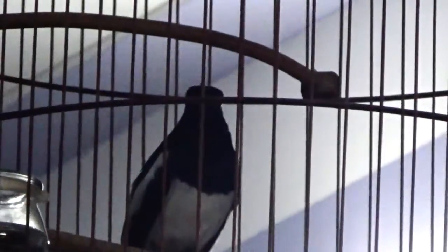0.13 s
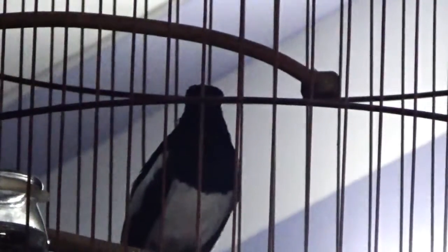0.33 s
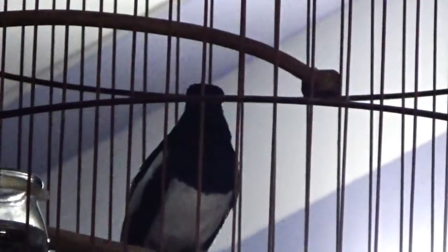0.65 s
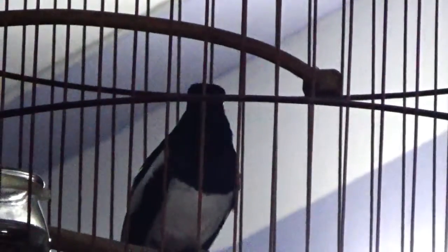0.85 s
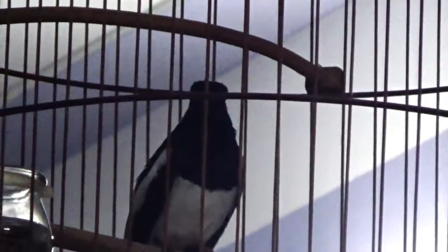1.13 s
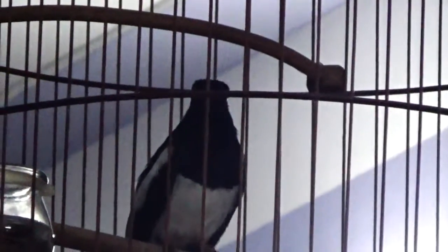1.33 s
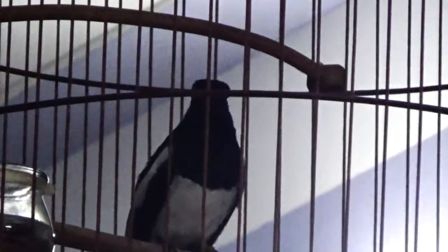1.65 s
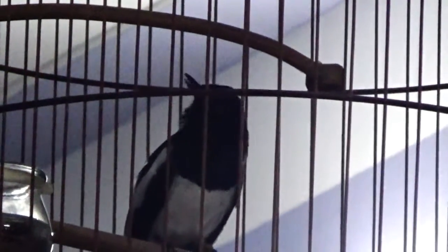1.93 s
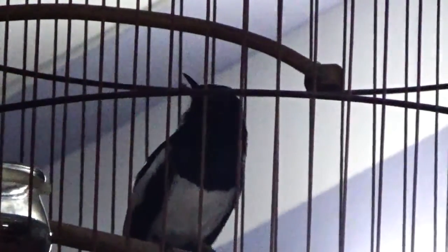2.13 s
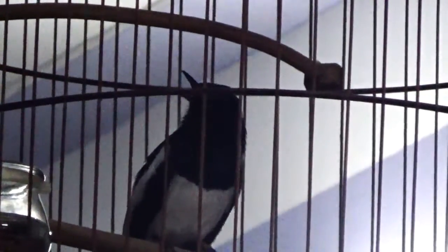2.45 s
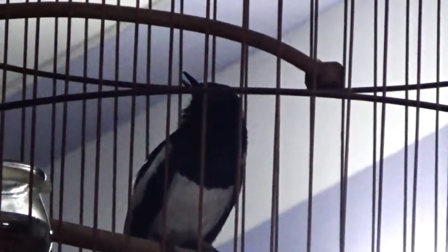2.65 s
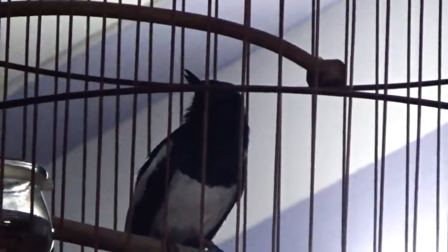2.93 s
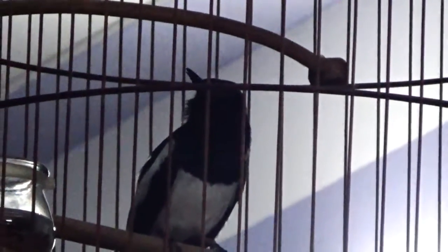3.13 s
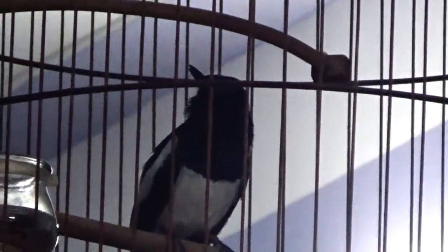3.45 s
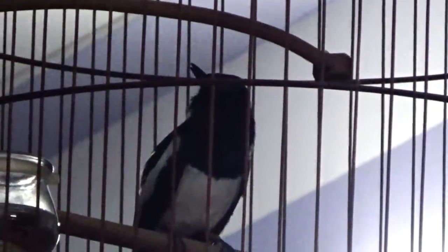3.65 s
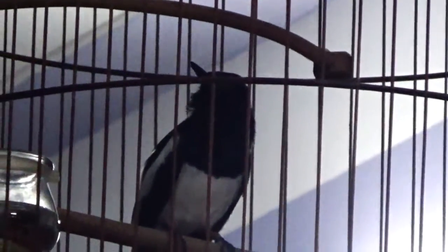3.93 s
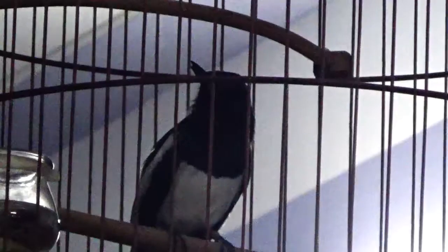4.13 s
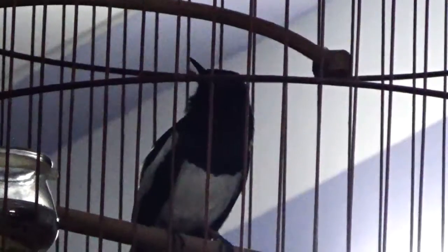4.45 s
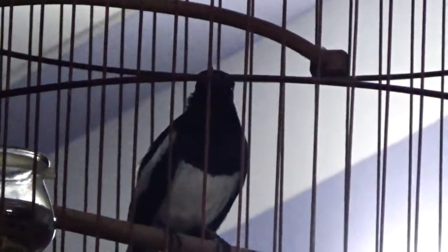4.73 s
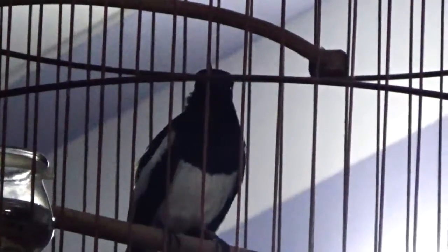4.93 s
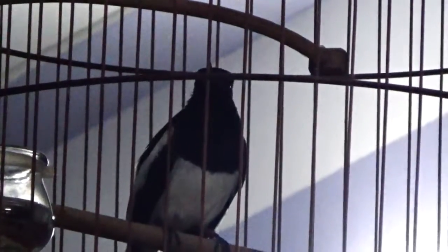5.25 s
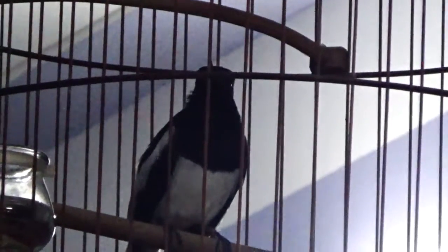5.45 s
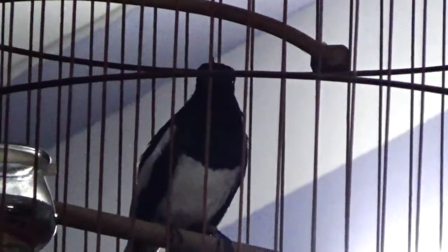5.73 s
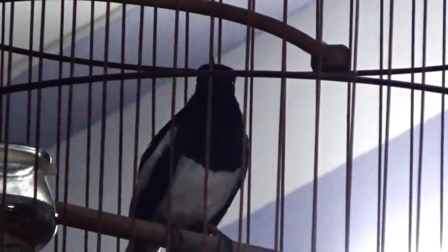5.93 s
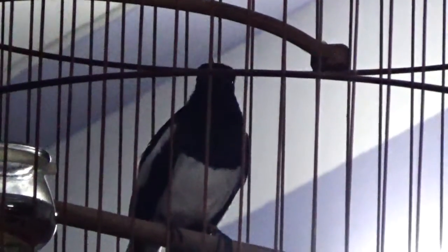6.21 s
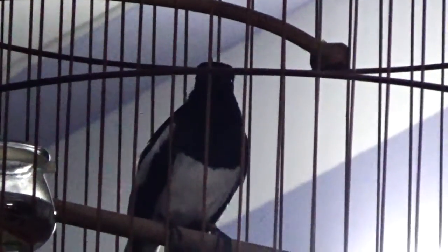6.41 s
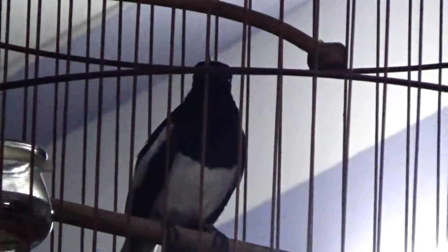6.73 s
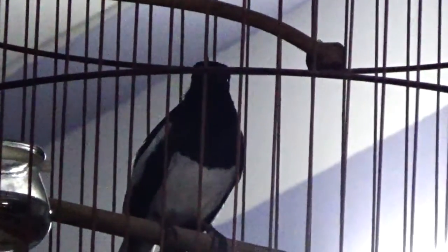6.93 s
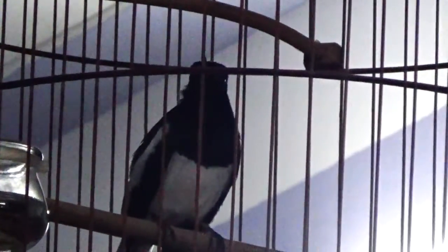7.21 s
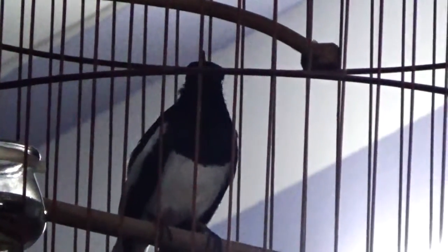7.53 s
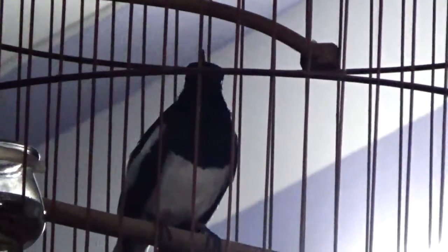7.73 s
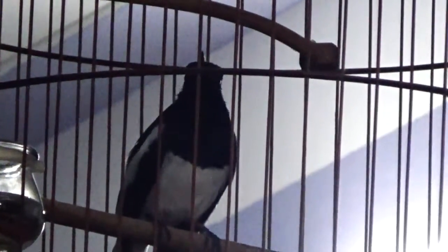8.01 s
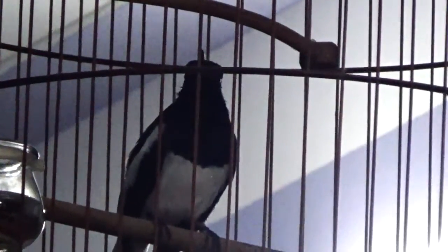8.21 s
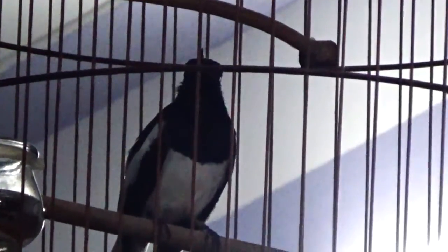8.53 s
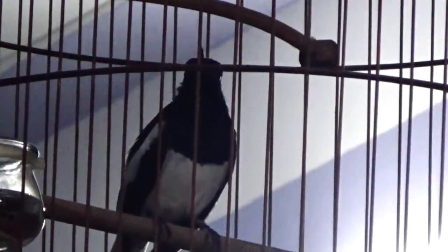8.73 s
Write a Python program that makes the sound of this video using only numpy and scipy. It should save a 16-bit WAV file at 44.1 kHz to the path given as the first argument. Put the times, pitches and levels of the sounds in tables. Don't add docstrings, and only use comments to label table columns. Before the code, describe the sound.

A short harsh rasp opens, then a caged songbird close by whistles loudly: a climbing phrase that falls away in slurred notes, a run of repeated hooked falls, a brief gap, then the climbing phrase again. Some notes turn hoarse or double. The hard room rings after each note. Underneath are faint hum, rustle and dull knocks on the handheld microphone, with far-off peeps and coos.

```python
import sys
import numpy as np
from scipy import signal
from scipy.fft import rfft, irfft, next_fast_len
from scipy.io import wavfile
from scipy.ndimage import uniform_filter1d, minimum_filter1d

SR = 44100
rng = np.random.default_rng(int(sys.argv[2]) if len(sys.argv) > 2 else 0)


def master(y):
    cut = np.clip(np.atleast_2d(y).T, -1, 1)
    pcm = np.round(cut * 32767)
    wavfile.write(sys.argv[1], SR, pcm.astype(np.int16))


def amplitude_ratio(level_db):
    exponent = np.asarray(level_db, float) / 20
    return 10 ** exponent


N = 391166
TIME = np.arange(N) / SR


def unit(x):
    return x / np.sqrt(np.mean(x ** 2))


def hiss(count=N):
    return rng.standard_normal(count)


def spectral(x, gain):
    size = next_fast_len(x.shape[-1], real=True)
    shaped = rfft(x, size) * gain(np.fft.rfftfreq(size, 1 / SR))
    return irfft(shaped, size)[..., :x.shape[-1]]


def colour(x, table):
    hz, db = np.transpose(table)
    return spectral(x, lambda f: amplitude_ratio(np.interp(np.log(f + 1), np.log(hz), db)))


def walk(rate):
    hold = int(SR / rate)
    steps = np.repeat(hiss(N // hold + 1), hold)
    return unit(uniform_filter1d(uniform_filter1d(steps, hold), hold)[:N])


def lines(table):
    def peaks(f):
        return sum(amplitude_ratio(db) / (1 + (2 * (f - hz) / width) ** 2) for hz, width, db in table)
    return unit(spectral(hiss(), peaks))


def whistle(hz, gain, overtone_db, edge_s):
    thin_db, open_hz = 20, 2700
    closed_db = thin_db * np.clip(np.log2(open_hz / hz), 0, 2)
    third_db, fourth_db = overtone_db - 5.5 - closed_db, overtone_db - 23.5 - closed_db
    phase = 2 * np.pi * np.cumsum(hz) / SR
    tone = np.sin(phase)
    for partial, db in ((2, overtone_db), (3, third_db), (4, fourth_db)):
        tone = tone + amplitude_ratio(db) * np.sin(partial * phase) * (partial * hz < .4 * SR)
    age = np.arange(len(hz)) / SR
    ends = np.clip(np.minimum(age, age[::-1]) / edge_s, 0, 1)
    return np.sqrt(2) * gain * tone * ends


# pitch in Hz, width in Hz, level in dB.
HUM_LINES = [(70.3, 4.8, -16), (188, 2.4, -11), (221.2, 6, -3), (299, 6.3, -11), (360, 7.1, -15.5)]


def motor_hum(hum_db):
    hum = lines(HUM_LINES) * amplitude_ratio(hum_db - 2)
    whine = lines([(1335, 8, -66)]) * amplitude_ratio(-66 + 2.5 * walk(1.5))
    return hum + whine


# time in seconds, level in dB.
KNOCKS = [
    (.55, -44.5),
    (0.879, -51),
    (1.15, -40),
    (1.648, -38.5),
    (2.552, -45),
    (4.308, -38),
    (5.68, -31.5),
    (5.821, -36),
    (6.402, -41.5),
    (7.548, -42.5),
]


def phone_knocks():
    hits = np.zeros(N)
    for s, db in KNOCKS:
        hits[int(s * SR)] = amplitude_ratio(db)
    body = unit(colour(hiss(4000), [(25, -7), (120, -6), (1000, -17.5), (3000, -29)]))
    return signal.fftconvolve(hits, body * np.exp(-TIME[:4000] / 0.021))[:N]


def perch_claws():
    tick_age = TIME - 5.473
    tick = amplitude_ratio(-20) * np.sin(2 * np.pi * 6500 * tick_age) * np.exp(-(tick_age / .00008) ** 2)
    scrape_age = np.clip(TIME - 1.2, 0, None)
    wood = unit(colour(hiss(), [(700, -25), (1000, -3), (1350, 6), (1700, -28)]))
    swell = np.exp(-scrape_age / .12) * np.clip(scrape_age / .01, 0, 1)
    return tick + amplitude_ratio(-38) * wood * swell


# time in seconds, hum in dB, rustle in dB.
AIR_LEVELS = [(0.0, -54, -47), (0.15, -50, -51.5), (0.71, -53, -40.5), (0.86, -60, -35), (1.31, -52.5, -49),
              (3.14, -48, -52), (3.63, -47.5, -40), (3.95, -49, -47), (4.45, -45, -43.5),
              (5.11, -60.5, -53.5), (5.29, -44.5, -51), (5.9, -57, -48.5), (6.4, -51.5, -57),
              (6.67, -56.5, -52), (8.57, -52.5, -52), (8.87, -54, -49.5)]
# pitch in Hz, level in dB per Hz.
AIR_COLOUR = [(15, -80), (25, -26.5), (156, -12.5), (212, -12.5), (247, -39), (362, -14.5), (703, -36),
              (1850, -21), (2000, -23), (2780, 2), (3770, -28), (4070, -40), (11000, -42), (14300, -72),
              (22000, -120)]


def background():
    s, hum_db, rustle_db = np.transpose(AIR_LEVELS)
    air_curve = AIR_COLOUR[:7] + [(1600, -16), (4000, -11), (11000, -47.5)]
    bed = amplitude_ratio(-46.5) * unit(colour(hiss((2, N)), air_curve))
    rustle = unit(colour(hiss((2, N)), [(60, -24), (200, -3), (500, -5.5), (1100, -8), (1700, -14.5)]))
    air_mid, air_side = bed + rustle * amplitude_ratio(np.interp(TIME, s, rustle_db) + 3.5)
    hum = motor_hum(np.interp(TIME, s, hum_db))
    contact = phone_knocks() + perch_claws()
    mid = air_mid + hum + contact
    side = amplitude_ratio(-10.5) * air_side - amplitude_ratio(-24.5) * (air_mid + contact)
    return mid, side


# band centre in Hz, time to fall 60 dB in seconds, level in dB.
ROOM = [(930, 0.98, 5), (2000, 0.91, 3), (3000, 1.035, 2.5), (4400, 0.84, 1.5), (6000, 0.89, 0),
        (7550, 0.72, 1.5), (8570, 0.54, 9), (11450, 0.21, 2)]


def tail():
    gap_s, build_s = 0.0014, 0.0013
    age = np.arange(int(1.4 * SR)) / SR
    noise, out = rfft(hiss(len(age))), 0
    place = np.interp(np.fft.rfftfreq(len(age), 1 / SR), np.array(ROOM)[:, 0], np.arange(len(ROOM)))
    for k, (hz, t60, db) in enumerate(ROOM):
        band = irfft(noise * np.clip(1 - abs(place - k), 0, 1), len(age))
        out = out + amplitude_ratio(db - 60 * age / t60) * band
    out = out * np.clip((age - gap_s) / build_s, 0, 1)
    return out / np.sqrt(np.sum(out ** 2))


# start in seconds, end in seconds, first pitch in Hz, last pitch in Hz, level in dB.
FAR_CALLS = [
    (3.33, 3.44, 4120, 4100, -41),
    (3.8, 3.9, 4350, 4750, -39),
    (4.0, 4.2, 4750, 4650, -41),
    (6.65, 6.74, 4430, 4400, -40),
    (8.52, 8.57, 3550, 3730, -36),
    (8.58, 8.72, 3740, 3740, -36),
    (4.22, 4.33, 760, 750, -50),
    (4.4, 4.55, 770, 680, -51),
    (4.62, 4.7, 640, 630, -53),
    (2.33, 2.45, 820, 850, -55),
]


def far_birds():
    out = np.zeros(N)
    for start, end, first_hz, last_hz, db in FAR_CALLS:
        span = slice(int(start * SR), int(end * SR))
        glide = np.linspace(first_hz, last_hz, span.stop - span.start)
        out[span] += whistle(glide, amplitude_ratio(db), -37, 0.005)
    return out


# pitch in Hz, level in dB per Hz.
RASP_COLOUR = [(880, -65), (1500, -49.5), (2090, -31), (2540, -30.5), (2710, -22.5), (3310, -19.5),
               (3850, -7), (4660, -12), (6190, -9), (11000, -26), (14300, -66), (22000, -120)]


def earlier_rasp():
    return amplitude_ratio(-15.5 - 60 * TIME / 0.88) * unit(colour(hiss((2, N)), RASP_COLOUR))


# time in seconds, level in dB.
RASP_LEVELS = [(0, -44.5), (.03, -45.5), (.055, -49), (0.064, -15), (0.093, -11.5), (.12, -57.5),
               (.15, -84.5)]


def rasp():
    s, db = np.transpose(RASP_LEVELS)
    noise = unit(colour(hiss(), RASP_COLOUR))
    return noise * amplitude_ratio(np.interp(TIME, s, db, right=-120) + 0.94 * walk(187))


# start in seconds, end in seconds, pitch scatter as a share, flutter in dB.
HOARSE = [(.865, .91, .03, 3), (1.325, 1.45, .03, 3), (1.94, 2.05, .035, 3), (2.216, 2.33, .012, 2),
          (3.27, 3.38, .035, 3), (3.665, 3.76, .04, 3), (4.06, 4.15, .04, 3), (4.49, 4.6, .025, 3),
          (4.91, 5.03, .02, 2), (6.0, 6.05, .03, 3), (6.545, 6.66, .04, 3), (7.19, 7.3, .035, 3),
          (7.476, 7.6, .012, 2), (8.56, 8.66, .03, 3)]


def hoarseness():
    scatter, flutter_db = np.zeros(N), np.zeros(N)
    for start, end, share, db in HOARSE:
        inside = np.clip(np.minimum(TIME - start, end - TIME) / .008, 0, 1)
        scatter = scatter + share * inside
        flutter_db = flutter_db + db * inside
    return scatter, flutter_db


# time in seconds, pitch in Hz, level in dB.
CLIMB = [
    [(0.385, 1800, -45.5), (0.4, 1920, -41.5), (0.418, 2210, -15.5)],
    [(0.42, 2630, -18), (0.44, 2660, -28), (0.49, 2873, -27), (0.515, 3300, -19.5), (0.54, 3436, -17),
     (0.59, 3520, -16.5)],
    [(0.603, 3706, -19), (0.63, 4066, -14), (0.66, 4246, -15.5), (0.7, 4317, -8.5)],
    [(0.703, 4620, -17.5), (0.745, 4690, -32)],
    [(0.8, 4900, -26), (0.83, 4990, -18), (0.873, 5110, -21.5)],
    [(0.873, 4990, -18.5), (0.9, 4496, -19)],
    [(0.866, 5520, -15), (0.876, 6000, -26), (0.9, 6240, -25)],
    [(1.115, 5170, -18.5), (1.135, 4580, -21.5), (1.17, 3997, -16), (1.225, 3663, -24.5),
     (1.24, 3140, -25.5), (1.255, 2600, -45)],
    [(1.325, 2880, -22), (1.34, 2745, -30), (1.352, 2320, -24)],
    [(1.36, 3000, -29), (1.388, 2820, -31)],
    [(1.388, 3480, -21), (1.41, 3300, -21), (1.425, 3076, -23.5), (1.45, 2420, -35.5), (1.478, 1900, -48)],
    [(1.572, 3510, -27.5), (1.585, 4096, -14.5), (1.61, 4030, -16.5), (1.64, 3473, -13),
     (1.69, 3230, -22.5), (1.72, 2820, -34.5), (1.73, 2680, -20)],
    [(1.8, 5200, -30.5), (1.82, 4806, -25.5), (1.845, 3800, -23.5), (1.865, 2663, -25), (1.89, 2120, -37.5),
     (1.925, 1690, -46)],
    [(1.94, 2650, -31.5), (1.978, 2824, -18)],
    [(1.983, 3470, -34), (2.0, 3250, -22.5), (2.018, 2866, -27.5), (2.045, 2093, -34), (2.07, 1725, -45.5)],
    [(2.216, 2746, -27), (2.236, 2910, -13.5)],
    [(2.235, 3450, -15.5), (2.265, 3362, -19.5), (2.283, 3120, -27), (2.302, 3014, -21.5),
     (2.325, 2600, -28), (2.36, 1937, -31)],
    [(2.48, 2890, -42), (2.515, 3225, -23), (2.54, 3430, -13), (2.6, 3485, -34), (2.625, 3170, -21.5),
     (2.66, 2787, -24.5), (2.7, 2674, -27), (2.78, 2625, -26)],
    [(2.85, 1780, -50), (2.885, 1903, -34.5), (2.94, 2263, -26), (2.975, 2560, -31.5), (3.0, 2884, -18.5)],
    [(3.105, 2920, -29), (3.125, 3025, -15.5), (3.16, 2826, -22.5), (3.195, 2550, -37.5), (3.23, 2000, -32),
     (3.265, 1444, -46.5)],
    [(3.27, 3000, -24), (3.29, 3170, -26.5), (3.32, 2574, -24), (3.36, 2393, -37), (3.395, 2000, -34)],
]
FALLS = [
    [(3.475, 3557, -21.5), (3.487, 3990, -18), (3.52, 3166, -17.5), (3.55, 2630, -35), (3.585, 2070, -30),
     (3.62, 1570, -45), (3.65, 1310, -48)],
    [(3.668, 2800, -22), (3.712, 2880, -28)],
    [(3.684, 3417, -20), (3.71, 3300, -24), (3.73, 2792, -22.5), (3.755, 2500, -21.5)],
    [(3.858, 3330, -31), (3.868, 3876, -13.5), (3.9, 3276, -20), (3.945, 2790, -31), (3.975, 2000, -29),
     (4.01, 1660, -41), (4.04, 1290, -50)],
    [(4.065, 2697, -21), (4.105, 2810, -19)],
    [(4.078, 3245, -28), (4.1, 3093, -22), (4.13, 2570, -29.5), (4.17, 2160, -31)],
    [(4.282, 3200, -12), (4.292, 3833, -13.5), (4.33, 3252, -18), (4.37, 2760, -31), (4.41, 2027, -31),
     (4.45, 1617, -43), (4.48, 1280, -52)],
    [(4.49, 2436, -43.5), (4.515, 2908, -15.5), (4.56, 2590, -28.5), (4.62, 2080, -34)],
    [(4.718, 3150, -18), (4.73, 3847, -16.5), (4.76, 3235, -15.5), (4.795, 2940, -20.5), (4.825, 2370, -32),
     (4.86, 1724, -36.5), (4.895, 1346, -54)],
    [(4.91, 2702, -27.5), (4.94, 2797, -17.5), (4.99, 2622, -26.5), (5.025, 2374, -29.5)],
]
REPEAT = [
    [(5.53, 1710, -35.5), (5.548, 2000, -33), (5.56, 2190, -23)],
    [(5.56, 2465, -21.5), (5.6, 2595, -25.5), (5.64, 2925, -29), (5.66, 3235, -14.5), (5.682, 3392, -12),
     (5.73, 3420, -31.5)],
    [(5.748, 3530, -20), (5.77, 3880, -13.5), (5.825, 4228, -18), (5.845, 4370, -2)],
    [(5.847, 4500, -30.5), (5.885, 4560, -41)],
    [(5.935, 5280, -17), (5.965, 5266, -22), (5.998, 5315, -7.5)],
    [(5.996, 5030, -11.5), (6.03, 4610, -33)],
    [(6.003, 5580, -24), (6.022, 6120, -29), (6.045, 6040, -28)],
    [(6.335, 4760, -22), (6.37, 4217, -20), (6.41, 4004, -18.5), (6.445, 3350, -31.5), (6.465, 2890, -22)],
    [(6.545, 3030, -22), (6.56, 2600, -27.5), (6.572, 2380, -45)],
    [(6.575, 2880, -24.5), (6.6, 3000, -40)],
    [(6.602, 3600, -11), (6.62, 3450, -23.5), (6.635, 2948, -29.5), (6.66, 2295, -35.5), (6.695, 1650, -54)],
    [(6.79, 3830, -25.5), (6.805, 4136, -14), (6.835, 3930, -17.5), (6.86, 3573, -16.5),
     (6.91, 3240, -15.5), (6.945, 3026, -29.5), (6.955, 2700, -19)],
    [(7.04, 4846, -29), (7.06, 4555, -23.5), (7.085, 3790, -26.5), (7.11, 2594, -28), (7.14, 2000, -35),
     (7.18, 1620, -45)],
    [(7.192, 2630, -27), (7.228, 2900, -20)],
    [(7.228, 3480, -13), (7.245, 3200, -32.5), (7.262, 2707, -25.5), (7.29, 2120, -29), (7.31, 1730, -43)],
    [(7.476, 2610, -32.5), (7.497, 2940, -13)],
    [(7.496, 3428, -18), (7.515, 3390, -15.5), (7.535, 3155, -21.5), (7.57, 3000, -20), (7.6, 2377, -27),
     (7.635, 1754, -37.5)],
    [(7.77, 2777, -42.5), (7.8, 3200, -16.5), (7.825, 3280, -19.5), (7.885, 3412, -26), (7.92, 2897, -16.5),
     (7.96, 2666, -27), (8.04, 2568, -32.5), (8.1, 2707, -26)],
    [(8.165, 1480, -44.5), (8.185, 1880, -37), (8.23, 2208, -24), (8.265, 2630, -31.5),
     (8.285, 3010, -24.5)],
    [(8.39, 2984, -25.5), (8.41, 3144, -13), (8.45, 2900, -33), (8.485, 2580, -41.5), (8.515, 1925, -32.5),
     (8.56, 1516, -44)],
    [(8.56, 2950, -34.5), (8.59, 2743, -20), (8.63, 2517, -32.5), (8.67, 2070, -37)],
    [(8.765, 3450, -22.5), (8.778, 3930, -14.5), (8.81, 3200, -18.5), (8.84, 2800, -30.5),
     (8.868, 2270, -41)],
]
OVERTONE_DB = [-10, -18, -21, -8.5, -14, -11.5, -30, -15, -17, -6, -16, -19, -14.5, -20, -17.5, -16, -16.5,
               -19, -16.5, -19.5, -26, -19, -18, -23, -18.5, -21, -20.5, -21.5, -18, -19.5, -25.5, -2.5,
               -14.5, -21.5, -1.5, -16, -14, -35, -15.5, -9.5, -2, -12.5, -20, -14, -24, -22.5, -12, -17,
               -20, -13, -21.5, -25, -19.5]


def songbird():
    song_db, onset_s = 7, .007
    breath_db, puff_db, puff_s = -32, 9.5, 0.0097
    scatter, flutter_db = hoarseness()
    tremor, swell_db = 0.0029 * walk(150), 1.86 * walk(90)
    bend = 1 + tremor + scatter * walk(500)
    swell = amplitude_ratio(swell_db + flutter_db * walk(400))
    breath = unit(colour(hiss(), [(2000, -30), (4700, -16), (6000, 0), (10000, -1), (12000, -12)]))
    out = np.zeros(N)
    for note, overtone_db in zip(CLIMB + FALLS + REPEAT, OVERTONE_DB):
        s, note_hz, note_db = np.transpose(note)
        span = slice(int(s[0] * SR), min(int(s[-1] * SR), N))
        hz = uniform_filter1d(np.interp(TIME[span], s, note_hz), size=200)
        db = uniform_filter1d(np.interp(TIME[span], s, note_db), size=200) + song_db
        out[span] += whistle(hz * bend[span], amplitude_ratio(db) * swell[span], overtone_db, onset_s)
        leak_db = breath_db + puff_db * np.exp(-(TIME[span] - s[0]) / puff_s)
        leak_db = leak_db + 2.18 * flutter_db[span]
        out[span] += breath[span] * amplitude_ratio(db + leak_db)
    return out


# pitch in Hz, level in dB.
SHADOW = [(1500, -3), (3000, -3), (5000, -5), (7000, -9), (10000, -10)]
# pitch in Hz, level in dB.
SPREAD = [(1500, -16), (3000, -19.5), (5000, -14.5), (9000, -11.5)]


def scene():
    wet_db, lean_db = 1, -1
    near = songbird() + rasp()
    into_room = amplitude_ratio(wet_db) * near + far_birds()
    wet_mid = signal.fftconvolve(into_room, tail())[:N]
    wet_side = signal.fftconvolve(into_room, tail())[:N]
    ringing_mid, ringing_side = earlier_rasp()
    air_mid, air_side = background()
    mid = colour(near, SHADOW) + wet_mid + ringing_mid + air_mid
    side = colour(wet_side + ringing_side, SPREAD) + air_side
    return np.array([(mid + side) * amplitude_ratio(lean_db / 2), (mid - side) * amplitude_ratio(-lean_db / 2)])


def band_limit(x):
    return signal.sosfilt(signal.butter(12, 11380, fs=SR, output="sos"), x)


def record(dry):
    ceiling, top_hz = .82, 11000
    headroom = np.minimum(1, ceiling / (np.abs(dry).max(axis=0) + 1e-9))
    gain = uniform_filter1d(minimum_filter1d(headroom, size=400), size=400)
    cut = signal.ellip(10, .2, 80, top_hz, fs=SR, output="sos")
    mix = signal.sosfilt(cut, dry * gain * 0.92)
    return band_limit(mix)


dry = scene()
out = record(dry)
master(out)
```